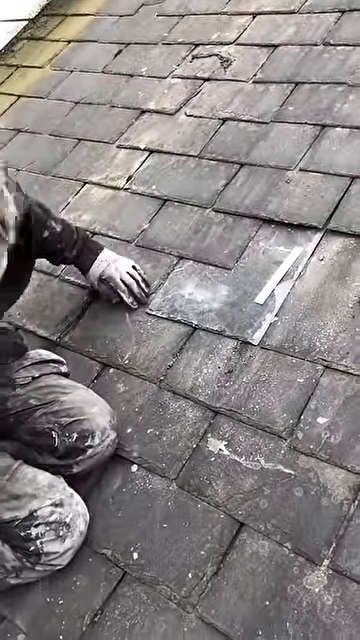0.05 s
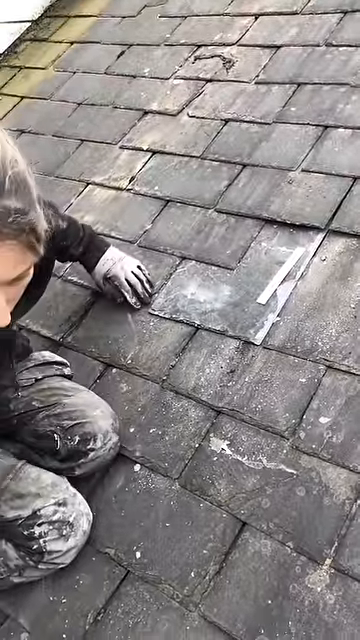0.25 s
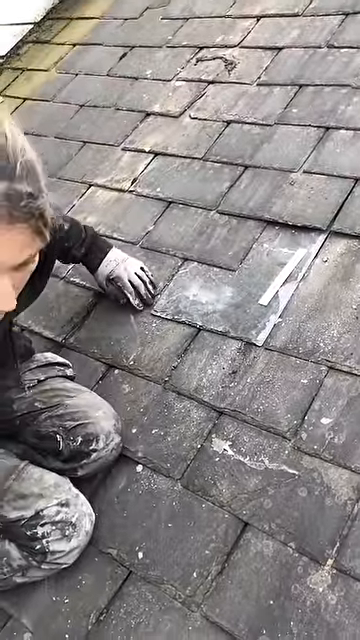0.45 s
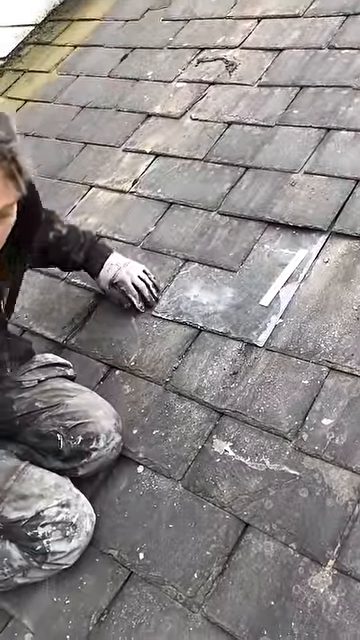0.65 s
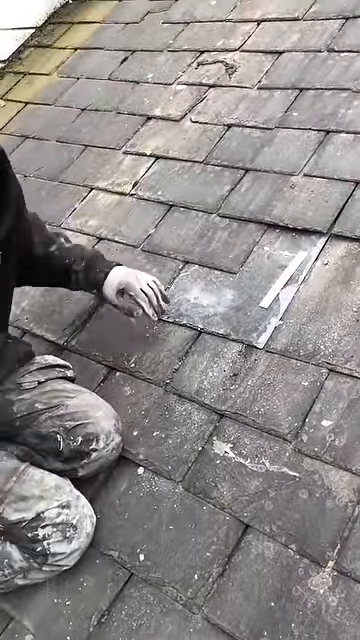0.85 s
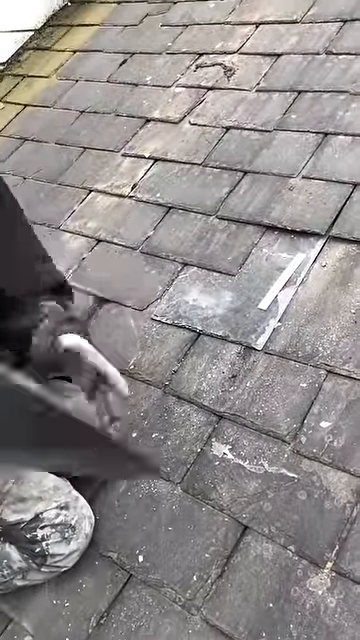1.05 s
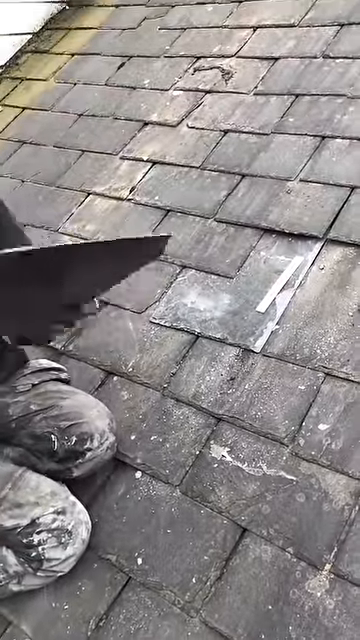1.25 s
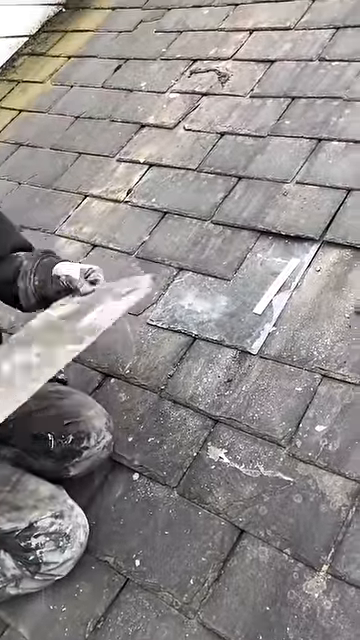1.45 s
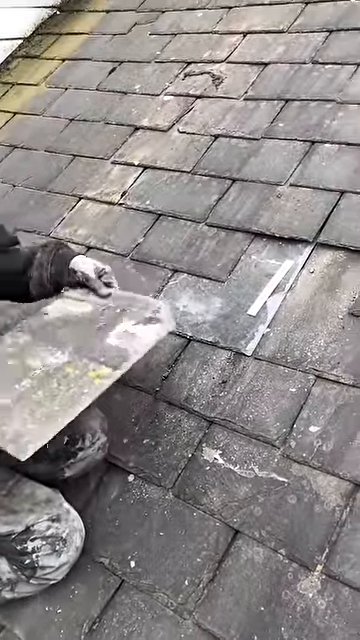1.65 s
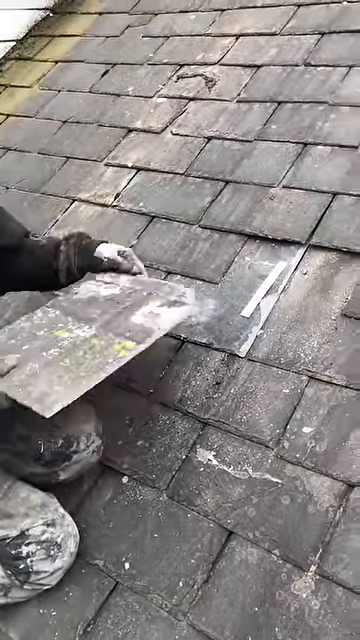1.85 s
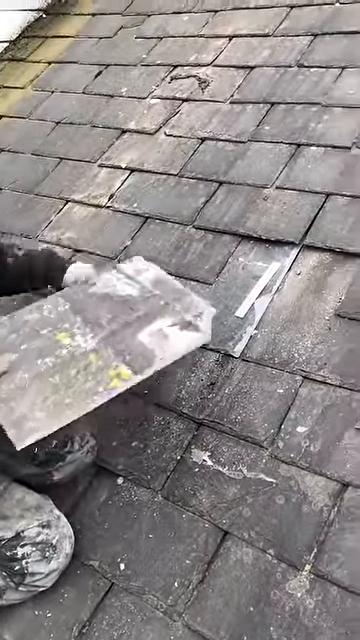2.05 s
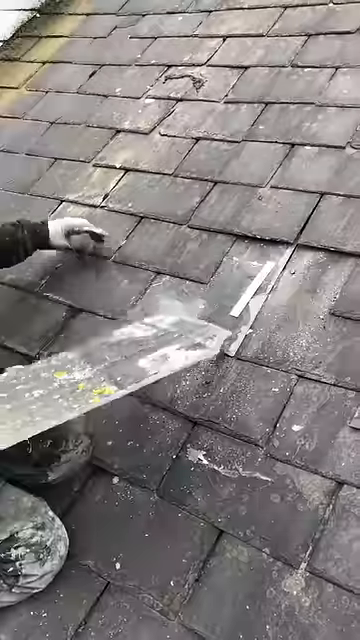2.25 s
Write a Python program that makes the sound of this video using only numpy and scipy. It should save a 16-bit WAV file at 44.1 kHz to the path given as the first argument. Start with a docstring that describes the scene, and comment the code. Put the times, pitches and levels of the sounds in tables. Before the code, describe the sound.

A slate tile knocks and drags against other slates, followed by gritty rubbing and ticks.

```python
"""On a slate roof, outdoors, a loose slate is worked free close to the microphone.
It drags and clacks against its neighbours, grit snaps between them and the deck knocks hollowly below;
the roofer's shifting weight thumps the rafters. Then the freed slate is turned in gloved hands:
gritty slides make it ring faintly, with one sharp tick among softer ones.
A bed of still air and low rumble lies under it all."""
import sys
import numpy as np
from scipy import signal
from scipy.fft import rfft, irfft
from scipy.io import wavfile

SR = 44100
rng = np.random.default_rng(int(sys.argv[2]) if len(sys.argv) > 2 else 0)


def wrap_up_sound(samples):
    """Save the sound to the file named by the first command line argument, as 16-bit audio."""
    columns = np.atleast_2d(samples).T
    # keep every value between -1 and 1, then stretch to whole-number steps
    tamed = np.clip(columns, -1, 1)
    steps = np.round(tamed * 32767).astype(np.int16)
    wavfile.write(sys.argv[1], SR, steps)


N = 101429
CLOCK = np.arange(N) / SR  # scene time [s]
T = np.arange(SR // 2) / SR  # time within one event [s]
CONTACT_S = 0.00054


def amp(db):
    """Decibels to gain."""
    return 10 ** (np.asarray(db) / 20)


def unit(x):
    """Scales to rms 1."""
    return x / np.sqrt(np.mean(x ** 2) + 1e-20)


def read(points, hz):
    """Reads a curve on a log-frequency axis."""
    f, value = np.transpose(points)
    return np.interp(np.log(hz + 1), np.log(f), value)


def add(mix, s, sound):
    """Mixes a sound in at time s."""
    part = mix[max(0, round(s * SR)):][:len(sound)]
    part += sound[:len(part)]


def colour(x, spectrum, tilt_db=0):
    """EQs x with a spectrum, tilted per octave, at rms 1."""
    hz = np.fft.rfftfreq(len(x), 1 / SR)
    eq_db = read(spectrum, hz) + tilt_db * np.log2(np.maximum(hz, 20))
    return unit(irfft(rfft(x) * amp(eq_db), len(x)))


def attack(rise_s):
    """Exponential fade-in."""
    return 1 - np.exp(-T / rise_s)


def decay(t60):
    """Falls 60 dB in t60 seconds."""
    return np.exp(-np.log(1000) * T / t60)


def burst(spectrum, t60s, rise_s, tilt_db=0):
    """Countless close modes struck at once: each octave dies at its own speed."""
    noise = rfft(colour(rng.choice([-1., 1.], len(T)), spectrum, tilt_db))
    octave = np.log2(np.clip(np.fft.rfftfreq(len(T), 1 / SR), 64, 16384))
    out = np.zeros(len(T))
    for k in range(6, 15):
        band = irfft(noise * np.maximum(1 - abs(octave - k), 0), len(T))
        out += band * decay(read(t60s, 2 ** k))
    return out * attack(rise_s)


def ring(modes, scatter_db=0, detune=0):
    """Modes build up during the contact; the place of the blow shifts their levels and pitches a little."""
    chance = rng.standard_normal((len(modes), 3))
    swing = np.zeros(len(T))
    for (hz, db, t60), (louder, sharper, phase) in zip(modes, chance):
        tone = np.sin(2 * np.pi * (hz * (1 + detune * sharper) * T + phase))
        swing += amp(db + scatter_db * louder) * decay(t60) * tone
    return swing * attack(CONTACT_S)


def tilted(modes, tilt_db):
    """A harder or softer contact favours the high or middle modes of a slate."""
    shelf_hz, pivot_hz = 2560, 3500
    return [(hz, db + tilt_db * np.log2(max(hz, shelf_hz) / pivot_hz), t60) for hz, db, t60 in modes]


def resonate(force, plate):
    """A plate driven by a rough force."""
    return signal.fftconvolve(force, plate / np.linalg.norm(plate))[:len(T)]


def grit(per_s, spread_db):
    """Friction texture: tiny catches of uneven size."""
    size = amp(spread_db * np.minimum(rng.exponential(1, len(T)), 5))
    return unit(size * rng.choice([-1., 1.], len(T)) * (rng.random(len(T)) < per_s / SR))


def stroke(length, peak):
    """Pressure of one stroke: swells to its peak and lets go."""
    ramp = np.interp(T / length, [0, np.clip(peak, .02, .98), 1], [0, 1, 0])
    return np.sin(np.pi / 2 * ramp)


# Spectra of the air and the rumble (frequency [Hz], level [dB])
AIR_EQ = [(20, -5), (60, 1), (150, -6), (500, -15), (1000, -6.5), (2000, -10), (4000, -13.5), (8000, -22.5),
          (16000, -44)]
RUMBLE_EQ = [(20, -38), (35, 12), (50, -8), (75, 3.5), (140, -6), (220, -8), (500, -13.5), (1200, -23),
             (4000, -41.5)]
# Fader ride on the rumble (time [s], level [dB])
RUMBLE_FADER = [(0, -51), (.13, -48.5), (.18, -71), (.3, -58), (1.0, -50.5), (1.3, -52.5), (1.42, -53.5),
                (1.6, -51), (1.85, -51.5), (2.07, -54.5), (2.15, -55.5), (2.3, -51.5)]

def outdoors():
    """The bed: still air and a low rumble that dips and swells."""
    air, rumble = rng.standard_normal((2, N))
    fader = amp(np.interp(CLOCK, *np.transpose(RUMBLE_FADER)))
    return amp(-62) * colour(air, AIR_EQ) + fader * colour(rumble, RUMBLE_EQ)


# Modes of a slate lying on the roof, for drags and knocks (frequency [Hz], level [dB], t60 [s])
LAID_SLATE = [(915, -7, 0.055), (1667, -7, 0.078), (1782, -11, 0.19), (2130, -12, 0.064), (2533, 3, 0.041),
              (2780, -16, 0.05), (3090, -3.5, 0.039), (3400, -3, 0.039), (3746, -1.5, 0.03),
              (4240, -5.5, 0.023), (4880, 1.5, 0.033), (5160, -1, 0.026), (6970, -6.5, 0.026),
              (7580, -12.5, 0.024)]
# Spectrum of the scrape (frequency [Hz], level [dB])
DRAG_EQ = [(30, -40), (120, -0.5), (300, 11.5), (750, 0.5), (1300, -4), (3000, -11), (6000, -20.5),
           (8000, -28), (10000, -35.5), (16000, -34.5)]
# Drag cues (start [s], length [s], peak position [0-1], level [dB], tilt [dB/octave])
DRAGS = [(0, 0.17, 0.2, -58.5, 3), (0.105, 0.17, 0.15, -45, 2.5), (0.183, 0.029, 0.43, -40, 3),
         (0.254, 0.047, 0.27, -45.5, 2.5), (0.294, 0.11, 0.48, -39, 2), (0.48, 0.089, 0, -36.5, 3),
         (0.625, 0.073, 0.43, -33.5, 2.5), (0.786, 0.069, 0.87, -33.5, 0), (0.856, 0.19, 0.84, -53.5, 0.5)]

def slate_drags():
    """Slate dragged across slate: a low, grainy scrape whose catches set off faint chinks."""
    out = np.zeros(N)
    for s, length, peak, db, tilt_db in DRAGS:
        grains, pressure = grit(per_s=2200, spread_db=3.5), stroke(length, peak)
        plate = ring(tilted(LAID_SLATE, tilt_db), scatter_db=3, detune=0.018)
        chinks = amp(-32) * resonate(grains * pressure, plate)
        scrape = pressure * colour(grains, DRAG_EQ, tilt_db)
        add(out, s, amp(db) * (scrape + chinks))
    return out


# Modes of a slate held in the air, for slides and ticks (frequency [Hz], level [dB], t60 [s])
HELD_SLATE = [(1008, -18, 0.068), (1310, -20.5, 0.12), (1887, -16, 0.05), (2537, -5, 0.061),
              (3078, -1.5, 0.059), (3338, -0.5, 0.03), (3750, -0.5, 0.023), (3944, 1.5, 0.022),
              (4330, -1, 0.02), (4610, -3.5, 0.021), (4880, -4.5, 0.028), (5270, -5, 0.024),
              (5910, -5, 0.025), (8840, -25, .03)]
# Spectrum of the glove's rub (frequency [Hz], level [dB])
RUB_EQ = [(150, -6), (600, -4), (1500, 0), (2600, -0.5), (4200, -2), (5500, -2.5), (7500, -7.5),
          (11000, -8.5), (16000, -12.5)]
# Slide cues (start [s], length [s], peak position [0-1], rub level [dB], rub tilt [dB/octave],
# ring level [dB], ring tilt [dB/octave])
SLIDES = [(0.005, 0.04, 0.4, -65, -6, -55.5, -35), (0.856, 0.28, 0.4, -70, -27, -64, 3),
          (1.12, 0.23, 0.12, -52, -2, -88, -13), (1.277, 0.05, 0.4, -43, 1, -52.5, 4),
          (1.289, 0.015, 0.64, -31.5, 11.5, -49, -8), (1.308, 0.22, 0.52, -54, -1, -56.5, 7),
          (1.477, .12, 0.26, -47.5, 0, -49.5, 6.5), (1.556, 0.16, 0.4, -52.5, -0.5, -55.5, 4),
          (1.665, 0.097, 0.65, -45, -0.5, -47, 3), (1.744, 0.14, 0.06, -53.5, 0, -73, 1.5),
          (1.796, 0.0097, .3, -43.5, 13, -65, 0), (1.844, 0.08, 0.49, -55, -1.5, -48.5, 7),
          (1.902, 0.04, 0.47, -44.5, 0.5, -39, 9), (1.925, 0.06, 0.35, -43, 2, -48, 16),
          (1.993, 0.035, 0.22, -38.5, 7.5, -35.5, 4.5), (2.01, 0.029, 0, -34, 6.5, -43, 1),
          (2.015, .016, 0.27, -52, 2, -35.5, -14.5), (2.113, 0.13, 0.04, -50.5, -2.5, -77, -11),
          (2.165, 0.93, 0.1, -56.5, -1, -64.5, 14)]

def glove_slides():
    """A glove rubs grittily over the slate; the contact travels, so the ring shifts during each slide."""
    out = np.zeros(N)
    for s, length, peak, rub_db, rub_tilt_db, ring_db, ring_tilt_db in SLIDES:
        grains, pressure = grit(per_s=4300, spread_db=1), stroke(length, peak)
        add(out, s, amp(rub_db) * pressure * colour(grains, RUB_EQ, rub_tilt_db))
        travel = np.minimum(T / length, 1)
        for share in (1 - travel, travel):  # crossfade between two contact points
            plate = ring(tilted(HELD_SLATE, ring_tilt_db), scatter_db=2.5, detune=0.0025)
            add(out, s, amp(ring_db) * resonate(grains * pressure * np.sqrt(share), plate))
    return out


# Strength of the reflection off the roof (time [s], share [0-1])
ECHO_SEND = [(1.78, 0.1), (1.88, 0), (1.96, 0.66), (2.0, 0.1), (2.12, 0.2)]

def roof_echo(direct):
    """Sound from the slate's underside bounces off the roof, dulled and inverted, hollowing the scrape."""
    notch_spacing_hz, scatter_above_hz = 1180, 6670
    hz = np.fft.rfftfreq(N, 1 / SR)
    delay = np.exp(-2j * np.pi * hz / notch_spacing_hz)
    bounce = irfft(rfft(direct) * delay / (1 + (hz / scatter_above_hz) ** 8), N)
    send = np.interp(CLOCK, *np.transpose(ECHO_SEND))
    return (direct - send * bounce) / np.sqrt(1 + send ** 2)


# Modes of the rafters (frequency [Hz], level [dB], t60 [s])
RAFTER_MODES = [(63, -2, 0.24), (148.2, 0, 0.047), (292.5, -17.5, 0.11)]
# Spectrum of the thud (frequency [Hz], level [dB])
THUD_EQ = [(20, -56), (45, -11), (70, -1.5), (100, -5), (140, 2.5), (200, -10), (320, -9), (500, -30),
           (1500, -73)]
# Thump cues (time [s], level [dB], tilt [dB/octave])
THUMPS = [(0.075, -39.5, -6.5), (0.516, -41, -3), (0.572, -28, 11), (0.651, -32, 21.5), (0.713, -29.5, 5),
          (0.914, -34, -3.5), (1.009, -24, 3), (1.026, -25.5, 2), (1.168, -40.5, -3), (1.239, -33, 4),
          (1.28, -42.5, -1), (1.54, -43.5, -2), (2.225, -48.5, -0.5)]

def weight_thumps():
    """The roofer's weight shifts: each soft push thuds and sets the rafters swinging."""
    rise_s, pivot_hz = 0.0038, 100
    thud_t60s = [(60, 0.25), (400, 0.031)]  # (frequency [Hz], t60 [s])
    out = np.zeros(N)
    for s, level_db, tilt_db in THUMPS:
        modes = [(hz, db + tilt_db * np.log2(hz / pivot_hz), t60) for hz, db, t60 in RAFTER_MODES]
        rafters = ring(modes, detune=0.029) * attack(rise_s)
        thud = amp(-2.5) * burst(THUD_EQ, thud_t60s, rise_s, tilt_db)
        add(out, s, amp(level_db) * (rafters + thud))
    return out


# Spectra of the slate's crack and the deck's rattle (frequency [Hz], level [dB])
CRACK_EQ = [(300, -33), (800, 2.5), (1250, -0.5), (1750, 7.5), (2350, -6.5), (2690, 9.5), (3400, 0),
            (4800, -5), (6000, -3.5), (7500, -10), (12000, -12.5), (16000, -28)]
RATTLE_EQ = [(30, -43), (100, -10), (180, -11), (270, -2.5), (450, -0.5), (600, -5), (800, -7.5),
             (1000, -8), (1300, -16.5), (3000, -36), (8000, -50)]
# Their decay times (frequency [Hz], t60 [s])
CRACK_T60 = [(500, 0.015), (2000, 0.034), (5000, 0.038), (14000, 0.04)]
RATTLE_T60 = [(100, 0.44), (350, 0.35), (800, 0.15), (3000, 0.41)]
# Hollow modes of the deck (frequency [Hz], level [dB], t60 [s])
DECK_MODES = [(266, 4.5, 0.046), (366.5, -0.5, 0.054), (450, -1.5, 0.069), (683, -2.5, 0.053),
              (794, 2, 0.044), (964, -1, 0.061)]
# Knock cues (time [s], crack level [dB], tilt [dB/octave], ring level [dB], rattle level [dB],
# boom level [dB], boom centre [Hz])
KNOCKS = [(.103, -43, 2.5, -51, -74, -66, 770), (0.142, -40, -6, -74, -41.5, -39, 835),
          (0.1971, -28, -1.5, -43, -34, -40, 360), (0.2465, -35, -1.5, -52, -39.5, -47, 800),
          (0.2919, -31.5, -6.5, -55, -30.5, -25, 363), (0.356, -33, -8.5, -43, -33.5, -42, 444),
          (0.3663, -33.5, -1.5, -39.5, -33, -18.5, 452), (0.4297, -39.5, 1.5, -75, -60, -55, 450),
          (0.4558, -30.5, 1.5, -52, -74, -67, 766), (0.4687, -20.5, 2.5, -20, -29, -23, 890),
          (.477, -35, -14, -43, -30.5, -13, 358), (.487, -41, 2, -56, -33, -27, 447),
          (.497, -42, -7, -52, -62, -15.5, 630), (0.52, -27, -4.5, -37.5, -41, -28, 670),
          (0.532, -37, -16, -47, -45, -48, 450), (0.571, -14, 4, -42, -24.5, -12, 800),
          (.5738, -21.5, -3, -35, -28.5, -15.5, 279), (.585, -31, 2.5, -38, -35, -21, 440),
          (0.6192, -25, -2.5, -56, -28.5, -21, 900), (.629, -30, -3, -50, -38, -37, 280),
          (0.644, -20, -2.5, -33.5, -28.5, -14, 786), (.653, -25, -2.5, -43, -27, -10.5, 268),
          (0.6641, -27, -7, -38, -37.5, -32, 450), (.677, -43, 1, -49, -29, -47, 365),
          (0.791, -28.5, -9, -47, -30, -24, 810), (.802, -37, -3, -48, -36, -21, 397),
          (0.8248, -27, -4, -52, -38, -21, 400), (.843, -51, -3, -54, -34.5, -23, 373)]

def slate_knocks():
    """Slate cracks on slate and rings; the deck rattles, and booms at a pitch set by the place struck."""
    boom_width_oct = 0.28
    out = np.zeros(N)
    for s, crack_db, tilt_db, ring_db, rattle_db, boom_db, boom_hz in KNOCKS:
        crack = burst(CRACK_EQ, CRACK_T60, rise_s=0.00072, tilt_db=tilt_db)
        tail = amp(-29) * colour(rng.standard_normal(len(T)), CRACK_EQ, tilt_db + 1) * decay(t60=0.21)
        slate = ring(tilted(LAID_SLATE, tilt_db), scatter_db=3.5, detune=0.0049)
        add(out, s, amp(crack_db) * (crack + tail) + amp(ring_db) * slate)
        struck_modes = [(hz, db - 6 * (np.log2(hz / boom_hz) / boom_width_oct) ** 2, t60)
                        for hz, db, t60 in DECK_MODES]
        boom = ring(struck_modes, detune=0.011) * attack(rise_s=0.004)
        rattle = burst(RATTLE_EQ, RATTLE_T60, rise_s=0.0016)
        add(out, s, amp(rattle_db) * rattle + amp(boom_db) * boom)
    return out


# Snapping crumbs of grit (time [s], level [dB], pitch [Hz])
CRUMBS = [(.2268, -48, 6900), (.262, -47, 8300), (.3168, -43.5, 6200), (.3595, -36.5, 5640),
          (.512, -48, 7200), (.5212, -40, 7450), (.5567, -50, 5200), (.6197, -36, 8150), (.6245, -35, 8200),
          (.6565, -26.5, 6000), (.678, -36, 5600), (.8052, -37.5, 6560), (.8255, -44, 7400),
          (.8435, -53, 6900)]

def crumb_snaps():
    """Single crumbs snap between the slates: tiny clicks of noise with one bright resonance."""
    out = np.zeros(N)
    for s, db, hz in CRUMBS:
        peak_eq = [(hz / 4, -29), (hz / 1.24, -20), (hz, 0), (hz * 1.24, -20), (hz * 4, -29)]
        snap = colour(rng.choice([-1., 1.], len(T)), peak_eq)
        add(out, s, amp(db) * snap * attack(CONTACT_S) * decay(t60=0.015))
    return out


# Spectrum of a tick (frequency [Hz], level [dB])
TICK_EQ = [(450, -19), (720, -14), (1800, -5), (3000, -11), (3900, 13.5), (5000, -1), (6000, 7), (7300, -7),
           (16000, -16.5)]
# Its decay times (frequency [Hz], t60 [s])
TICK_T60 = [(700, 0.074), (4000, 0.019), (14000, 0.047)]
# Slow bending of the whole slate (frequency [Hz], level [dB], t60 [s])
BENDING_MODES = [(319.4, -29, 0.54), (724, -19, 0.079)]
# Tick cues (time [s], click level [dB], ring level [dB])
TICKS = [(1.259, -45, -44), (1.36, -43.5, -58), (1.4729, -19.5, -28), (1.477, -42, -28), (1.71, -37, -64),
         (1.73, -39.5, -49), (2.194, -38.5, -54)]

def slate_ticks():
    """Ticks on the slate in the hand: a bright click, a choked ring and a low note as the plate bends."""
    out = np.zeros(N)
    for s, click_db, ring_db in TICKS:
        click = burst(TICK_EQ, TICK_T60, rise_s=0.00024)
        ringing = ring(HELD_SLATE) * decay(t60=0.045) + ring(BENDING_MODES)
        add(out, s, amp(click_db) * click + amp(ring_db) * ringing)
    return out


def scene():
    """The bed, the roof and the slate in the hand, mixed to mono."""
    bed = outdoors()
    on_roof = slate_drags() + weight_thumps() + slate_knocks() + crumb_snaps()
    in_hand = roof_echo(glove_slides() + slate_ticks())
    return (bed + on_roof + in_hand)[None]


def record(dry):
    """Master EQ: a bass cut and a steep band limit."""
    bass_cut_hz, top_hz = 51.3, 16000
    bass_cut = signal.butter(3, bass_cut_hz, "high", fs=SR, output="sos")
    band_limit = signal.firwin(511, top_hz, window=("kaiser", 9), fs=SR)
    return signal.oaconvolve(signal.sosfilt(bass_cut, dry), band_limit[None], "same")


dry = scene()
out = record(dry)
wrap_up_sound(out)
```